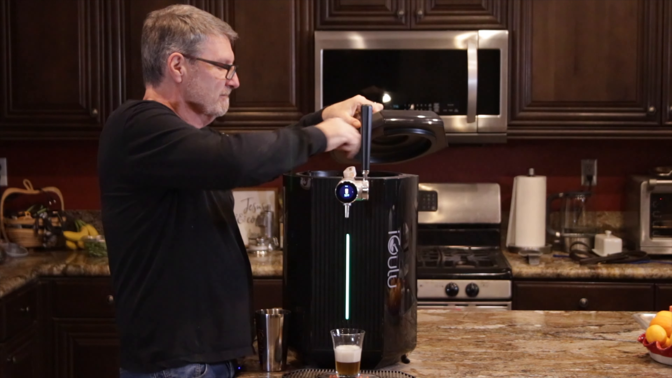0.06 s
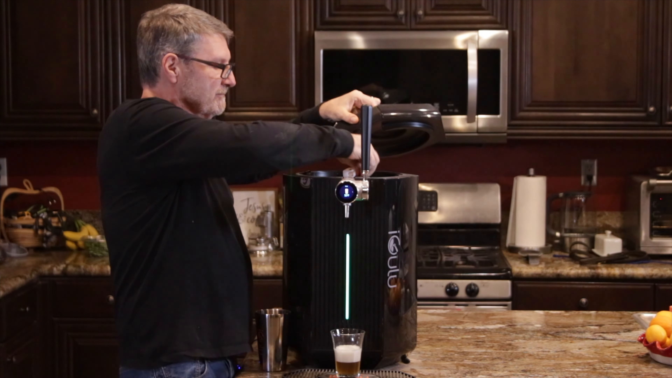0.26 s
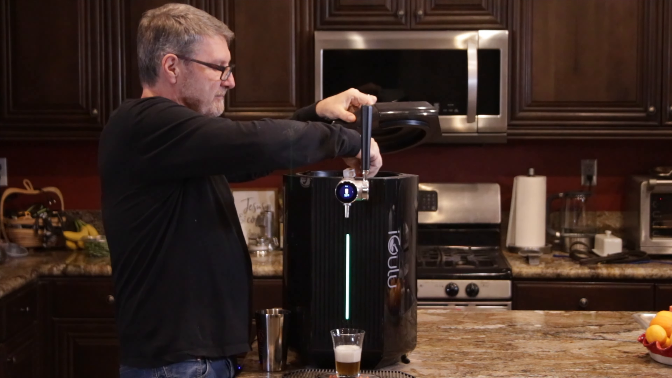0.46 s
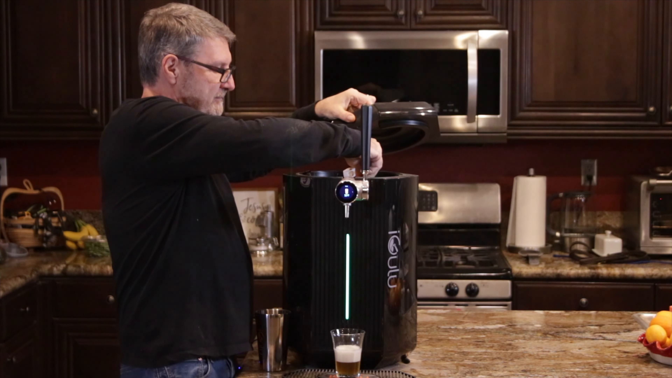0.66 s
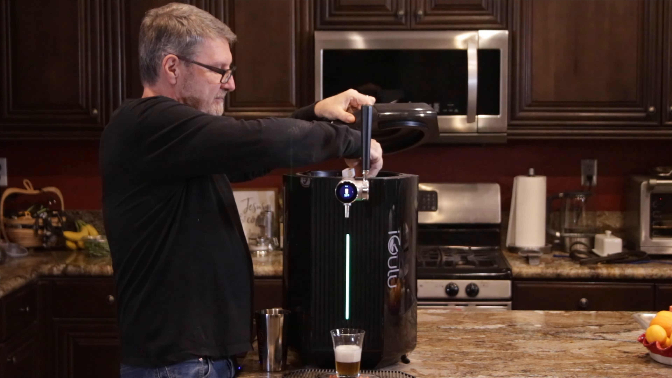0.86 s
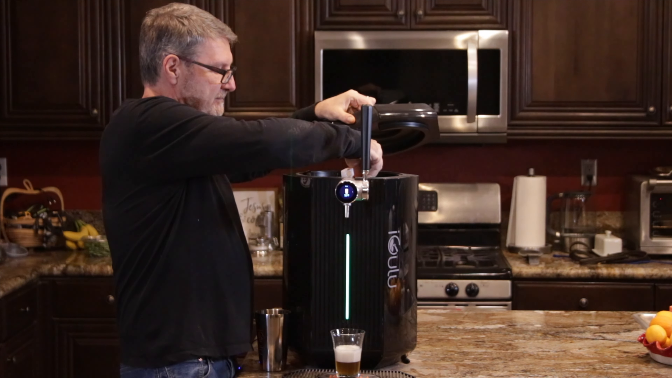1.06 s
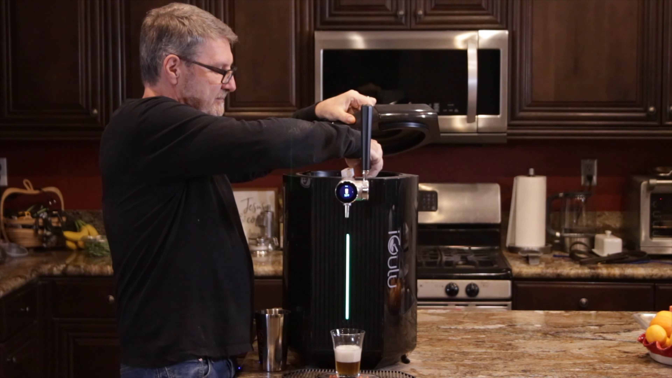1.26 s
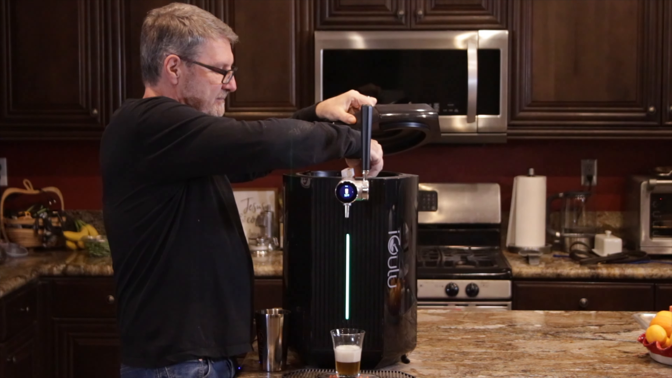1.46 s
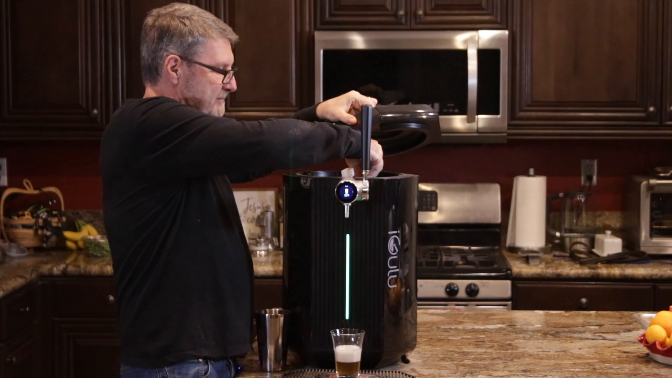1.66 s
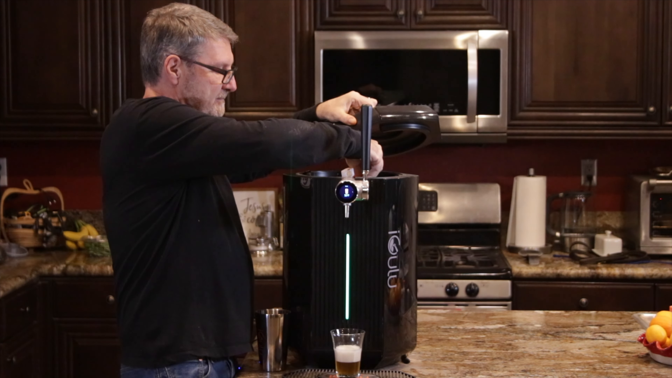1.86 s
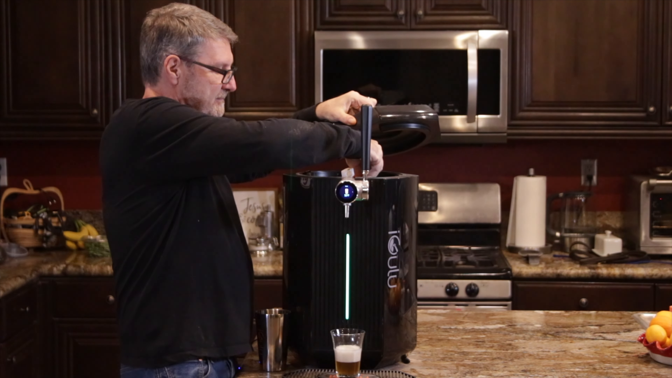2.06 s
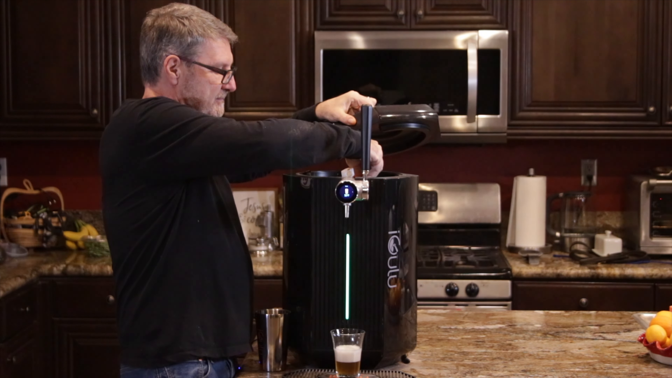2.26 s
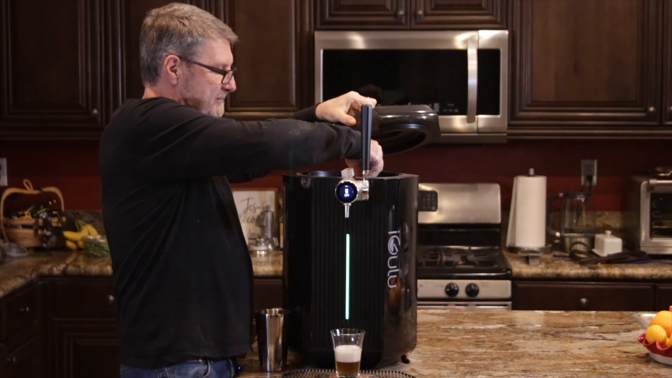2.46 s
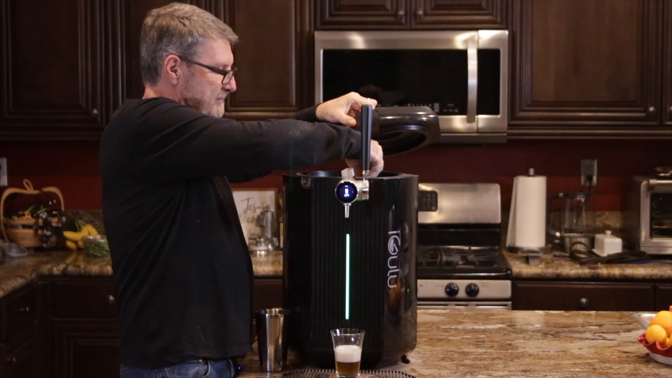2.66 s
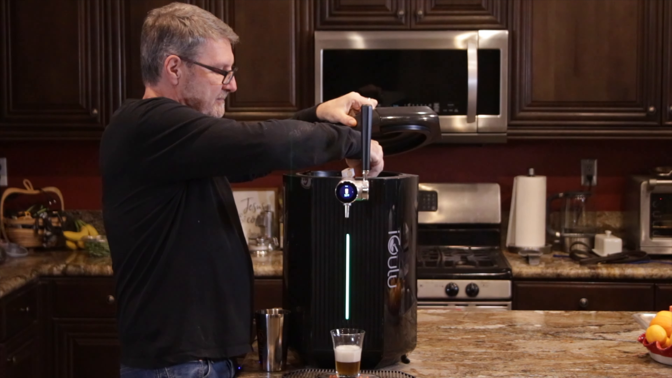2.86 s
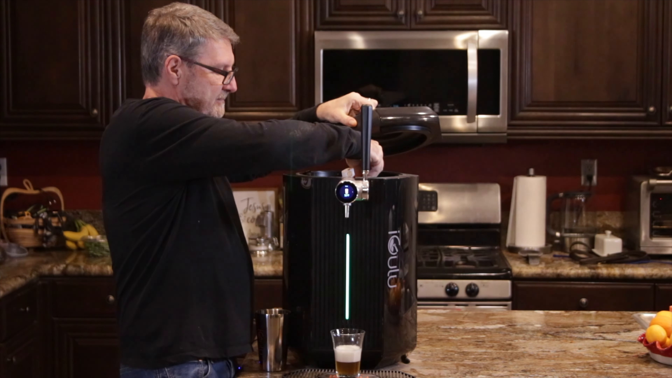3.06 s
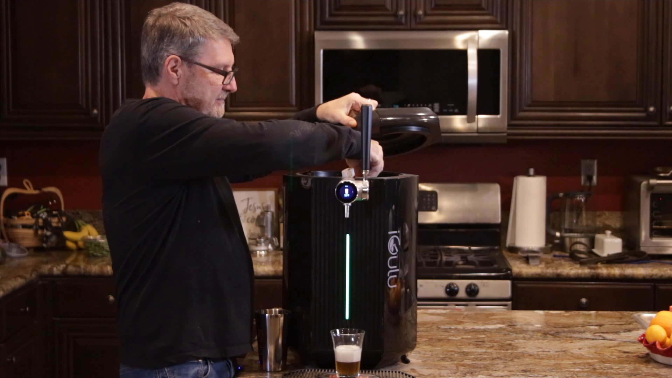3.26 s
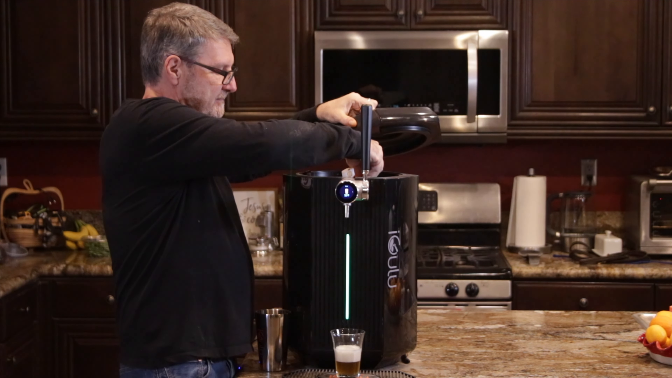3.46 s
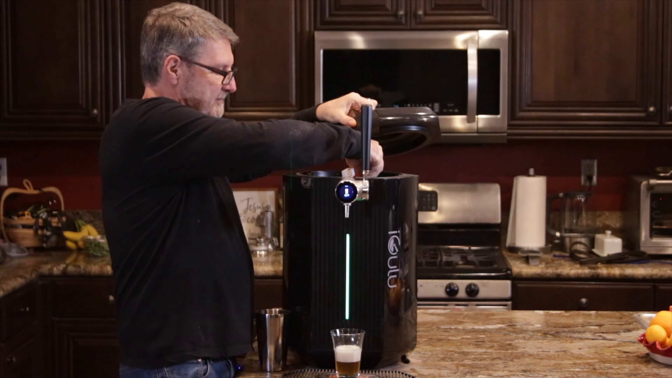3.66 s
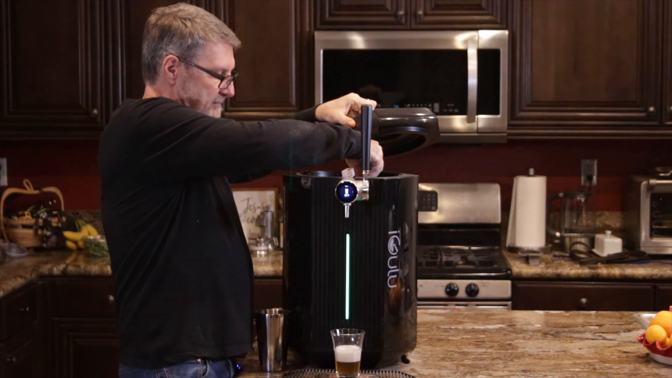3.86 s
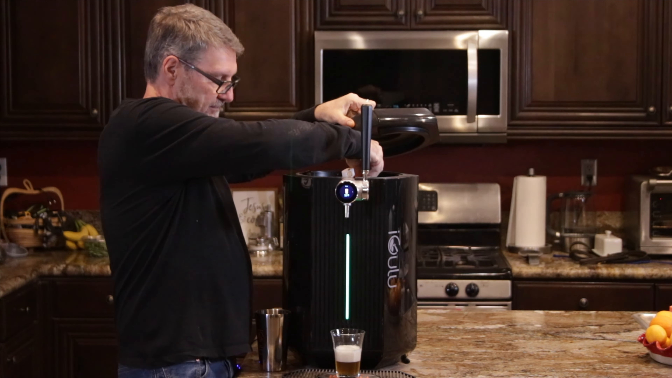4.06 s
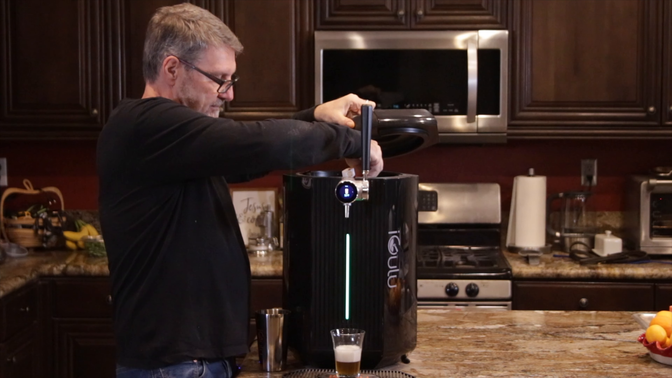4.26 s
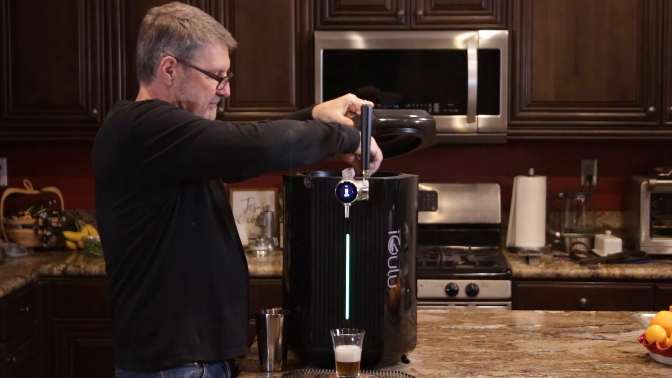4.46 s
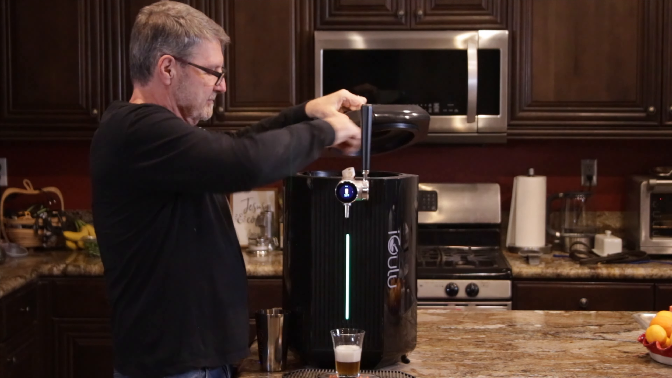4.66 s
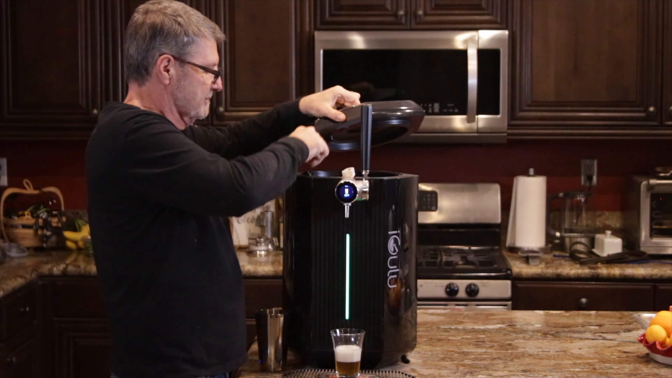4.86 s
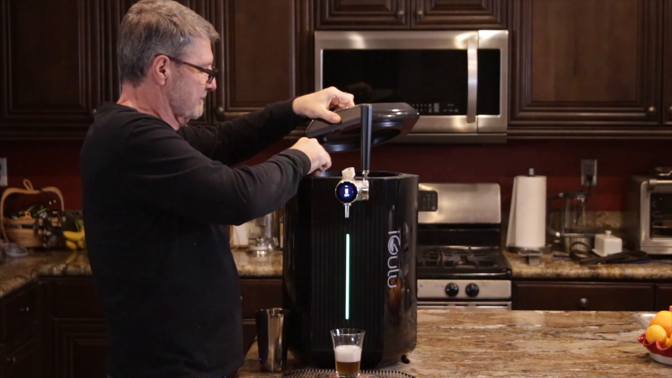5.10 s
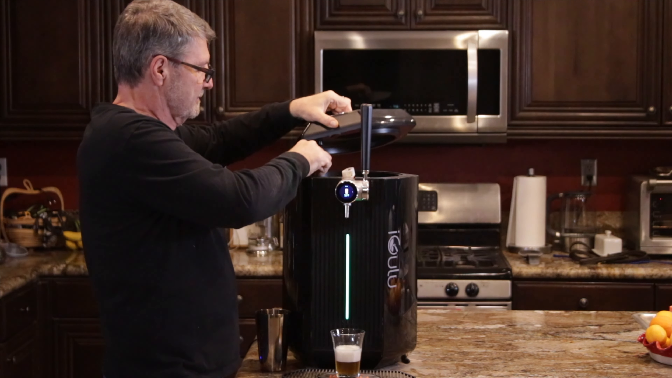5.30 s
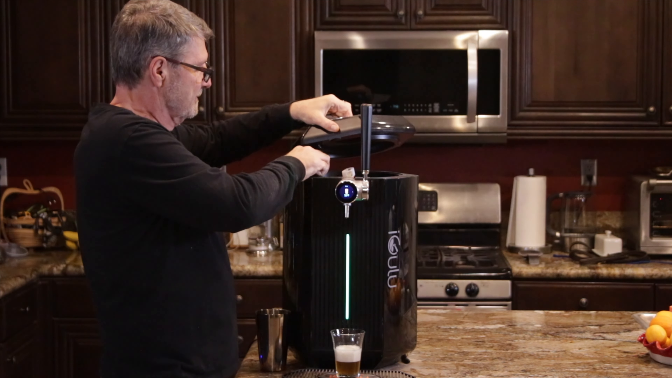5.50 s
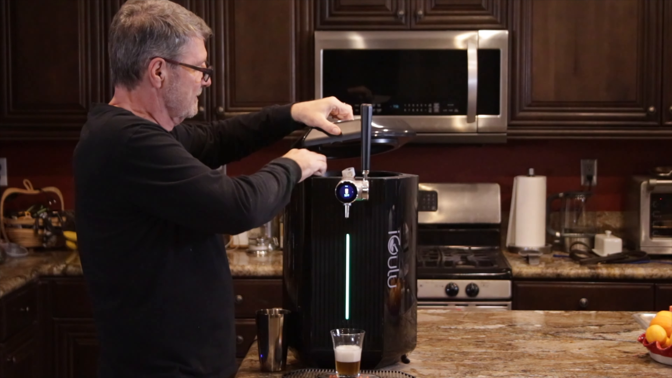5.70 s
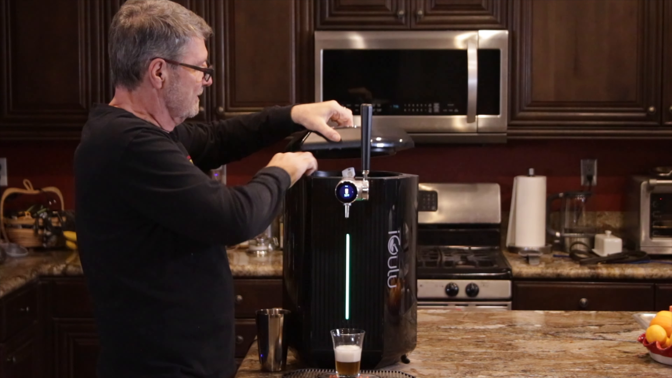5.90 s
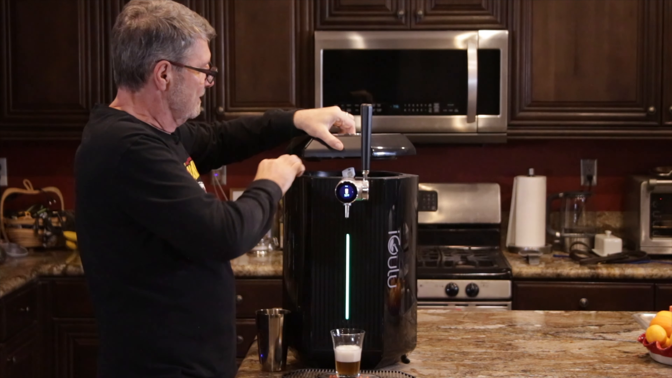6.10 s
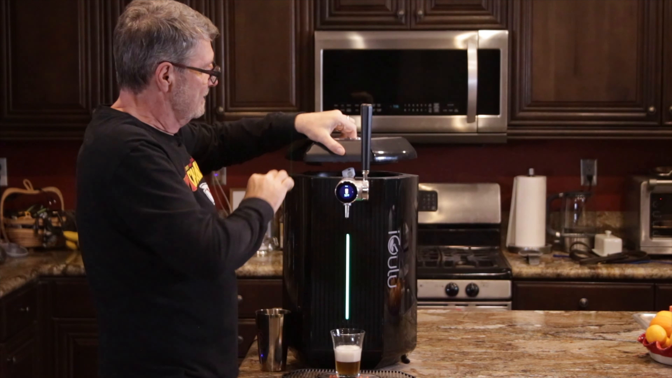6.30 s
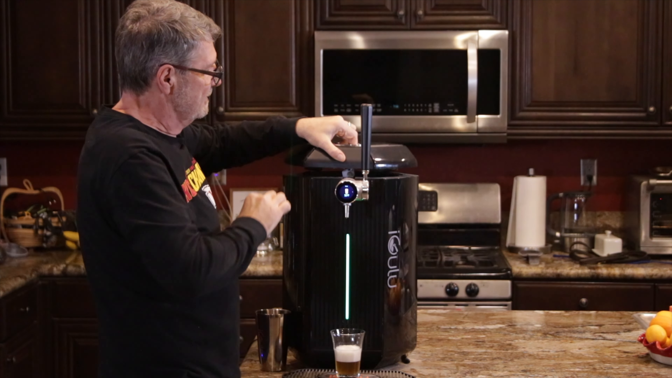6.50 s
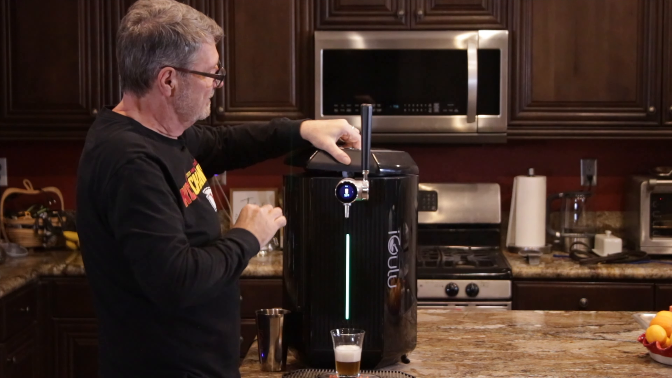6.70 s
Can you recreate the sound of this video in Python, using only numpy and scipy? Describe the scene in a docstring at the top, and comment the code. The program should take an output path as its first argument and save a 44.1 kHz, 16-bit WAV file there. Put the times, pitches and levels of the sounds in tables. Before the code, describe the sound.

Close, nearly mono recording in a quiet kitchen with low room rumble. After a barely audible sleeve brush and soft tap, a keg valve opens suddenly into a loud, steady, bright gas hiss lasting about three seconds, slightly dulling and weakening before it stops short. Then faint plastic lid taps, a hard rattling knock, a crisp latch click and a last bassier knock.

```python
"""Gas vents from a home brewing keg in a kitchen: the valve hisses for three seconds and dulls as pressure falls.
The jet is shaped noise with flickering treble, over a hollow rush and a faint whistle.
A brush of cloth and one soft tap come before; afterwards the plastic lid gives light taps, a rattling knock, a
latch click and a bassier knock, made of decaying modes and noise bursts.
Low thumps and quiet room noise lie underneath; all is nearly mono."""
import sys
import numpy as np
from scipy import signal
from scipy.fft import rfft, irfft
from scipy.io import wavfile
from scipy.ndimage import uniform_filter1d

SR = 44100
rng = np.random.default_rng(int(sys.argv[2]) if len(sys.argv) > 2 else 0)


def digitize_waveform(pressure):
    """Quantize a signal to 16-bit integers and store it at the path in sys.argv[1].

    Rows of a 2-D input are taken as channels; values are limited to [-1, 1].
    """
    field = np.atleast_2d(pressure).T
    bounded = np.clip(field, -1, 1)
    quanta = np.round(bounded * 32767).astype(np.int16)
    wavfile.write(sys.argv[1], SR, quanta)


N = 297234

# Spectrum of the jet. Each row: frequency in Hz, relative level in dB.
JET_SPECTRUM = [(100, -47), (500, -21.5), (1200, -20), (1950, -20.5), (2600, -13), (3000, -6.5),
                (3700, -2.5), (5100, 0.5), (5650, -7), (7500, -8), (11000, -10.5), (15500, -11)]
# Resonances of the valve and its recess. Each row: centre in Hz, width in Hz, lift in dB.
VALVE_RESONANCES = [(894, 170, 7), (2895, 76, 3), (3750, 390, 3), (4370, 130, -2.5), (4570, 210, 4.5),
                    (6350, 240, 2), (7480, 210, 1.5), (8150, 250, -0.5), (8940, 280, -2.5),
                    (9640, 210, 4.5), (10500, 550, 5.5), (11860, 550, -3), (12300, 180, 5),
                    (13400, 350, 0.5), (13800, 400, -4.5), (14600, 500, -0.5), (15400, 500, -6)]
# Surges of gas as the finger bears down. Each row: centre in seconds, lift in dB, half length in seconds.
SURGES = [(0.924, 5.5, 0.016), (1.13, 2.5, 0.02), (4.11, 1.4, 0.043)]
# Spectrum of the rush in the housing. Each row: frequency in Hz, relative level in dB.
RUSH_SPECTRUM = [(40, -24), (80, -23), (115, -4.5), (165, -2), (220, -4.5), (320, 1.5), (450, -6),
                 (700, -7), (830, -5.5), (950, -14.5), (1080, -13), (2000, -19.5)]
# Modes of lid and housing. Each row: frequency in Hz, relative level in dB, full t60 in seconds.
LID_MODES = [(172, 2.5, 0.26), (217, -5, 0.15), (279, 8.5, 0.26), (341.3, 1, 0.45), (414, 0.5, .24),
             (590, 1, 0.3), (713, 5.5, 0.33), (777, 9, 0.16), (895, 9, 0.18), (930, 6, 0.32),
             (1015, 7.5, 0.13), (1206, 10, 0.11), (1336, -7, 0.35), (1480, -12, 0.3), (1490, 8, 0.3),
             (1610, -8, 0.17), (2025, 7, 0.19), (2194, 4, 0.24), (2160, -21, .26), (2680, -12, .22)]
# Blows on the lid. Each row: start in seconds, level in dB, contact low-pass in Hz, lift of the bass modes
# in dB, pitch favoured by the struck spot in Hz.
KNOCKS = [(0.304, -52.5, 1100, 3.5, 375), (5.014, -48.5, 3380, -20, 2220), (5.029, -49, 2400, -18, 790),
          (5.387, -53, 1780, -7, 823), (5.440, -51, 4200, -12, 2150), (5.451, -49, 3000, 3, 970),
          (5.462, -43, 4200, 0, 1990), (5.475, -44.5, 900, 6.5, 208), (5.836, -26.5, 2570, -15, 1100),
          (5.852, -25, 2020, -10, 724), (5.859, -23, 2040, -4, 920), (5.868, -19.5, 1700, -11, 1190),
          (5.882, -32, 2320, -3, 1100), (5.920, -37.5, 1800, 1, 1260), (5.949, -39, 1400, -1, 965),
          (6.635, -46, 1530, -9, 660), (6.645, -39.5, 1600, -11, 640), (6.657, -35, 1920, -9, 1390),
          (6.667, -37.5, 1700, -4, 1240), (6.693, -28.5, 2460, 10, 367), (6.721, -31, 2000, 8, 229)]
# Latch clicks. Each row: start in seconds, level in dB, centre in Hz, spread as a ratio, t60 in seconds.
CLICKS = [(5.462, -41, 4300, 1.3, 0.044), (6.099, -40, 10820, 1.1, 0.099),
          (6.1093, -17.5, 4240, 2.14, 0.0016), (6.1131, -31.5, 1790, 2.0, 0.013),
          (6.1218, -24.5, 1760, 2.5, 0.0053), (6.237, -44, 4320, 1.17, 0.023),
          (6.692, -29, 2500, 1.03, 0.012)]
# Low thumps. Each row: start in seconds, peak of the first push in dB, peak of the second in dB.
THUMPS = [(0.906, -31, -28.5), (4.3, -37, -43), (4.372, -47, -53), (5.844, -35, -24), (6.267, -39, -41),
          (6.336, -46, -58), (6.703, -38, -25)]
# Spectrum of the room noise. Each row: frequency in Hz, relative density in dB per Hz.
ROOM_SPECTRUM = [(15, -35), (25, -14), (66, -9.5), (126, -4.5), (144, -11.5), (188, -9), (289, -9.5),
                 (322, -11), (359, -7.5), (469, -14), (826, -14), (1080, -17.5), (1170, -16), (1410, -17),
                 (15500, -15.5)]

T = np.arange(N) / SR
F = np.fft.rfftfreq(N, 1 / SR)
AGE = T[:SR]  # one second, for single events
TOP_HZ = 15450
# valve: flow comes and goes at a steady rate in dB
OPEN_S, SHUT_S, OPEN_DB_PER_S, SHUT_DB_PER_S = 0.914, 4.143, 520, 500
# jet: slow sag, plus an extra one once the keg runs low
JET_DB, SAG_DB_PER_S, RUNS_LOW_S, LOW_DB_PER_S = -24, 0.84, 2.92, 5
# top treble relative to the jet's core: start, both falls, loss per dB of throttling
TOP_DB, TOP_SAG_DB_PER_S, TOP_LOW_DB_PER_S, TOP_DB_PER_THROTTLE_DB = -4.5, 2.2, 4, 0.49
RUSH_DB, RUSH_GROW_DB_PER_S, RUSH_RELEASE_DB_PER_S = -50, 0.5, 61
WHISTLE_HZ, WHISTLE_DB, WHISTLE_BUILD_S = 841.5, -55, 1.8
WHISTLE_RELEASE_DB_PER_S, WHISTLE_LINGER_DB = 55, -73.5
ROOM_DB, HISS_SIDE_DB = -60, -1
RUMBLE_EARLY_DB, RUMBLE_LATE_DB, RUMBLE_GROW_S = 5, 9, 2.7
RUMBLE_FADE_DB, RUMBLE_FADE_S = -4.5, 0.2  # fade-in
# light taps ring briefly, mostly at the struck spot; hard blows ring more of the lid for longer
LIGHT_DB, HARD_DB = -39, -26.5
LIGHT_RING, HARD_RING = 0.36, 0.85  # share of full t60
LIGHT_SPOT_DB, HARD_SPOT_DB = 13, 7.5
SECOND_PUSH_S = 0.018


def undb(db):
    """Decibels to gain."""
    return 10 ** (np.asarray(db) / 20)


def unit(x):
    """Scale to an rms of one."""
    return x / np.sqrt(np.mean(x ** 2))


def colour(points, hz):
    """Spectrum level in dB, interpolated over log frequency."""
    f, db = np.transpose(points)
    return np.interp(np.log(hz + 1), np.log(f), db)


def noise(db):
    """Unit-rms Gaussian noise with the given spectrum in dB."""
    return unit(irfft(rfft(rng.standard_normal(N)) * undb(db), N))


def band(x, hz, kind, order=2):
    """Butterworth filter."""
    sos = signal.butter(order, np.clip(hz, 5, SR * .45), kind, fs=SR, output="sos")
    return signal.sosfilt(sos, x)


def walk(rate_hz):
    """Smooth random wander of unit rms."""
    k = int(SR / rate_hz)
    steps = np.repeat(rng.standard_normal(N // k + 1), k)
    return unit(uniform_filter1d(steps, k)[:N])


def smooth_cells(shape, bins, frames):
    """Unit-rms random field smoothed over frequency and time."""
    field = uniform_filter1d(rng.standard_normal(shape), size=bins, axis=0)
    return unit(uniform_filter1d(field, size=frames, axis=1))


def fade(t60_s):
    """Exponential decay by 60 dB in t60_s."""
    return np.exp(-np.log(1000) * AGE / t60_s)


def add(out, start_s, x):
    """Mix x in at start_s."""
    i = int(start_s * SR)
    out[i:i + len(x)] += x[:max(N - i, 0)]


def throttle(t, release_db_per_s):
    """Level in dB re full flow, falling off before the valve opens and after it shuts."""
    return -OPEN_DB_PER_S * np.maximum(OPEN_S - t, 0) - release_db_per_s * np.maximum(t - SHUT_S, 0)


def room_noise(rumble_side_db=-8, rumble_hz=1100, dip_db=-7, sink_db=-11, recover_s=2.5, ramp_s=0.12):
    """Swelling rumble near the middle under steady, wide hiss, both from one noise spectrum."""
    spectrum_db = colour(ROOM_SPECTRUM, F)
    low_share = 1 / (1 + (F / rumble_hz) ** 2)
    scale = undb(ROOM_DB) / np.sqrt(np.mean(undb(spectrum_db) ** 2))

    def part(share):
        return scale * irfft(rfft(rng.standard_normal(N)) * undb(spectrum_db) * np.sqrt(share), N)

    rumble, rumble_side = part(low_share), part(low_share)
    hiss, hiss_side = part(1 - low_share), part(1 - low_share)
    grown_db = np.interp(T, [0, RUMBLE_GROW_S], [RUMBLE_EARLY_DB, RUMBLE_LATE_DB])
    grown_db = grown_db + np.interp(T, [0, RUMBLE_FADE_S], [RUMBLE_FADE_DB, 0])
    # rumble sinks as the jet starts and slowly recovers
    venting_now = np.clip(np.minimum(T - OPEN_S, SHUT_S - T) / ramp_s, 0, 1)
    sunk_db = venting_now * np.interp(T - OPEN_S, [0, recover_s], [sink_db, 0])
    swell = undb(grown_db + sunk_db + 0.32 * walk(6))
    # deepest bass stays down until the valve shuts
    deep = irfft(rfft(rumble) / (1 + (F / 85) ** 4), N)
    rumble = rumble + deep * (undb(dip_db * venting_now) - 1)
    side = undb(rumble_side_db) * rumble_side * swell + undb(HISS_SIDE_DB) * hiss_side
    return rumble * swell + hiss + np.outer([1, -1], side)


def kitchen(x, early_db=-12, tail_db=-18, t60_s=0.34):
    """Counter and cupboards return quick echoes, then a short dull tail."""
    early = rng.standard_normal(len(AGE)) * fade(0.017) * (AGE > .002)
    tail = band(rng.standard_normal(len(AGE)), 3400, "lowpass") * fade(t60_s) * (AGE > .012)
    response = undb(early_db) * early / np.linalg.norm(early)
    response = response + undb(tail_db) * tail / np.linalg.norm(tail)
    return x + signal.fftconvolve(x, response)[:N]


def thumps(swing_hz=17, t60_s=0.04, soft_hz=130):
    """Pairs of sudden low pushes, each a damped swing."""
    out = np.zeros(N)
    push = band(np.cos(2 * np.pi * swing_hz * AGE) * fade(t60_s), soft_hz, "lowpass")
    push = push / push.max()
    for start_s, first_db, second_db in THUMPS:
        add(out, start_s, undb(first_db) * push)
        add(out, start_s + SECOND_PUSH_S, undb(second_db) * push)
    return out


def sleeve(at_s=0.22, length_s=0.057, db=-63):
    """Sleeve brushes by as the hand reaches for the valve: a swell of band-limited noise."""
    brush = unit(band(rng.standard_normal(N), [5300, 7200], "bandpass", order=1))
    return undb(db) * brush * np.exp(-((T - at_s) / length_s) ** 2)


def clicks():
    """Small hard plastic parts snap: decaying band-limited bursts."""
    out = np.zeros(N)
    for start_s, db, hz, spread, t60_s in CLICKS:
        edges_hz = hz * max(spread, 1.03) ** np.array([-1, 1])
        burst = unit(band(rng.choice([-1, 1], len(AGE)), edges_hz, "bandpass", order=1))
        add(out, start_s, undb(db) * burst * fade(t60_s))
    return out


def lid_ring(bass_db, spot_hz, spot_db, ring, bass_hz=480, spot_width=0.17, detune=0.0077):
    """Sum of the lid's decaying modes, strongest near the struck spot's pitch."""
    modes = 0
    draws = rng.uniform(-0.89, 1, (len(LID_MODES), 2))
    for (hz, gain_db, t60_s), (turn, shift) in zip(LID_MODES, draws):
        lift_db = bass_db * (hz < bass_hz) + spot_db * np.exp(-(np.log(hz / spot_hz) / spot_width) ** 2)
        # grip and seating detune the lid a little from blow to blow
        phase = 2 * np.pi * hz * (1 + detune * shift) * AGE + np.pi * turn
        modes = modes + undb(gain_db + lift_db) * np.sin(phase) * fade(t60_s * ring)
    return modes


def knocks(crack_db=2, crack_t60_s=0.047, dense_db=-9, dense_full_t60_s=0.8, modes_db=-17):
    """Blows ring the lid's main modes and a noise wash of dense ones."""
    out = np.zeros(N)
    for start_s, db, hard_hz, bass_db, spot_hz in KNOCKS:
        ring = np.interp(db, [LIGHT_DB, HARD_DB], [LIGHT_RING, HARD_RING])
        spot_db = np.interp(db, [LIGHT_DB, HARD_DB], [LIGHT_SPOT_DB, HARD_SPOT_DB])
        modes = lid_ring(bass_db, spot_hz, spot_db, ring)
        wash = band(rng.standard_normal(len(AGE)), 514, "highpass", order=3)
        wash = unit(band(wash, 3400, "lowpass", order=1))
        decay = undb(crack_db) * fade(crack_t60_s) + undb(dense_db) * fade(dense_full_t60_s * ring)
        blow = undb(modes_db) * modes + wash * decay
        # softer contact is duller
        add(out, start_s, undb(db) * band(blow, hard_hz, "lowpass", order=3))
    return out


def whistle(wander_hz=4, waver_db=2.0):
    """Air across a small cavity: a thin, unsteady tone that builds with the venting and lingers."""
    phase = 2 * np.pi * np.cumsum(WHISTLE_HZ + wander_hz * walk(40)) / SR
    build = np.clip((T - OPEN_S) / WHISTLE_BUILD_S, 0, 1)
    level_db = np.maximum(WHISTLE_DB + throttle(T, WHISTLE_RELEASE_DB_PER_S), WHISTLE_LINGER_DB)
    return unit(np.sin(phase)) * build * undb(level_db + waver_db * walk(18))


def rush(waver_db=1.0):
    """Flow blows the hollow of the housing; it dies away more slowly than the jet."""
    level_db = RUSH_DB + RUSH_GROW_DB_PER_S * (T - OPEN_S) + throttle(T, RUSH_RELEASE_DB_PER_S)
    return noise(colour(RUSH_SPECTRUM, F)) * undb(level_db + waver_db * walk(11))


def venting(t, dullest_db=-21):
    """Jet level and relative top treble in dB: both fall with pressure and with a narrow opening."""
    flow_s = np.minimum(t, SHUT_S)
    since_open_s = np.maximum(flow_s - OPEN_S, 0)
    since_low_s = np.maximum(flow_s - RUNS_LOW_S, 0)
    valve_db = throttle(t, SHUT_DB_PER_S)
    surge_db = sum(db * np.exp(-((t - s) / length_s) ** 2) for s, db, length_s in SURGES)
    level_db = JET_DB - SAG_DB_PER_S * since_open_s - LOW_DB_PER_S * since_low_s + valve_db + surge_db
    top_db = TOP_DB - TOP_SAG_DB_PER_S * since_open_s - TOP_LOW_DB_PER_S * since_low_s
    top_db = top_db + TOP_DB_PER_THROTTLE_DB * valve_db
    return level_db, np.maximum(top_db, dullest_db)


def jet(flutter_db=0.35, flicker_db=0.66, drift_db=1.0, dull_from_hz=5000, seep_hz=4150, seep_db=9):
    """Turbulence at the valve rings its recess; the top fades first as pressure drops."""
    spectrum_db = colour(JET_SPECTRUM, F)
    for hz, width_hz, lift_db in VALVE_RESONANCES:
        spectrum_db = spectrum_db + lift_db * np.exp(-2 * ((F - hz) / width_hz) ** 2)
    gas = noise(spectrum_db)
    core = np.std(band(gas, [2800, 5600], "bandpass", order=6))
    top = np.std(band(gas, [10000, 15500], "bandpass", order=6))
    hz, t, cells = signal.stft(gas / core, SR, nperseg=256)
    level_db, top_db = venting(t)
    tilt_db = top_db - 20 * np.log10(top / core)
    reach = (np.maximum(hz - dull_from_hz, 0)[:, None] / 7200) ** 0.48
    # eddies make neighbouring frequencies flicker together
    eddies = smooth_cells(cells.shape, 9, 24)
    # the hand over the valve shifts; ripples in the treble drift with it
    drift = smooth_cells(cells.shape, 3, 300)
    # through a nearly shut valve gas seeps in one narrow band
    seep_shape = np.exp(-((hz - seep_hz) / 450) ** 2) - .5
    seep = np.outer(seep_shape, np.interp(level_db, [-52, -36], [seep_db, 0]))
    cells_db = reach * (tilt_db + drift_db * drift) + flicker_db * eddies + seep
    gas = signal.istft(cells * undb(cells_db), SR)[1][:N]
    return gas * undb(np.interp(T, t, level_db) + flutter_db * walk(34.97))


def scene(thump_right_db=-6):
    """Sources in the middle, thumps leaning left, room noise across both sides."""
    middle = kitchen(jet() + rush() + knocks()) + whistle() + clicks() + sleeve()
    return middle + np.outer([1, undb(thump_right_db)], thumps()) + room_noise()


def record(dry):
    """Steep elliptic low-pass at TOP_HZ."""
    return signal.sosfilt(signal.ellip(10, .2, 80, TOP_HZ, fs=SR, output="sos"), dry)


dry = scene()
out = record(dry)
digitize_waveform(out)
```